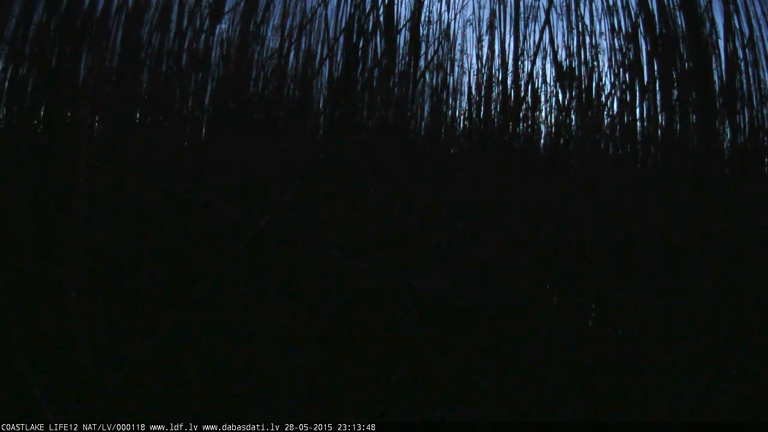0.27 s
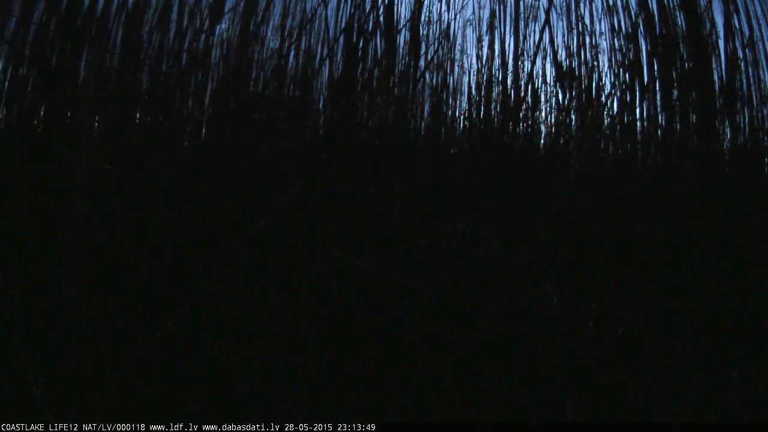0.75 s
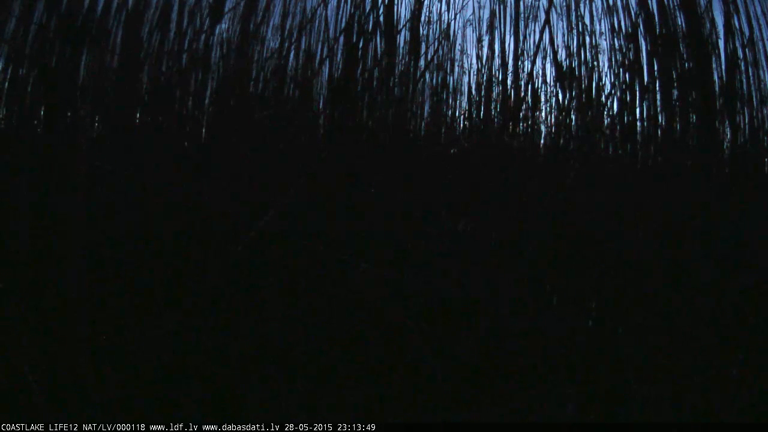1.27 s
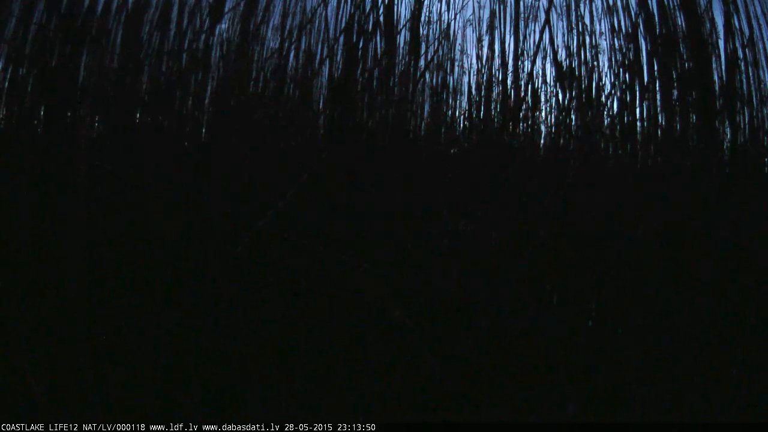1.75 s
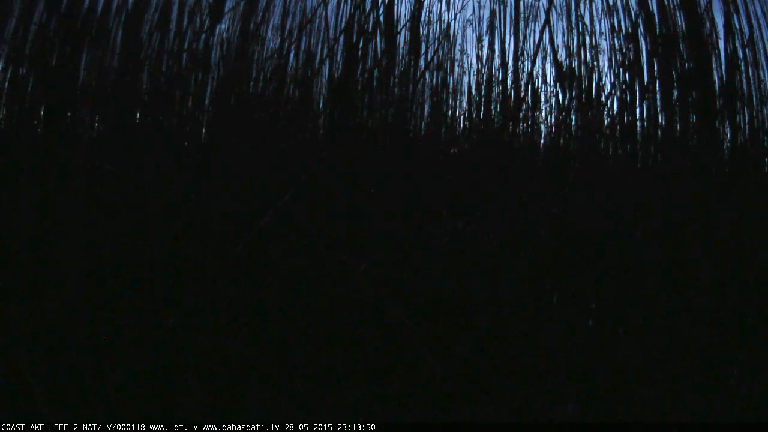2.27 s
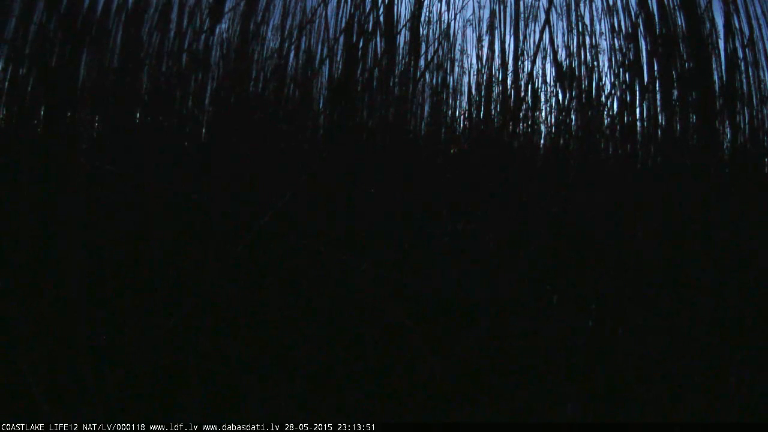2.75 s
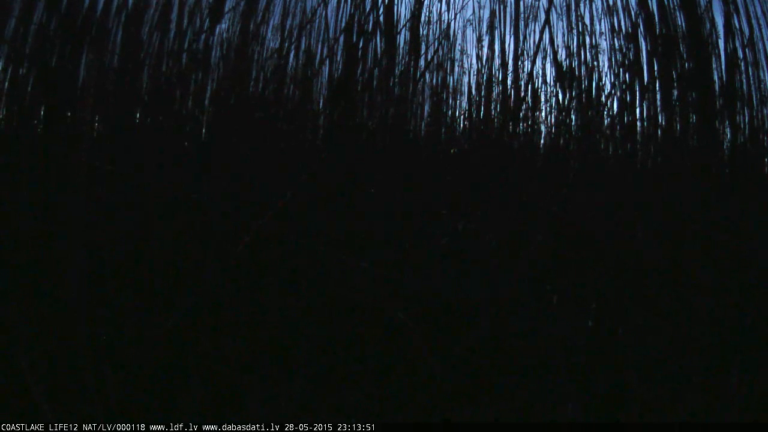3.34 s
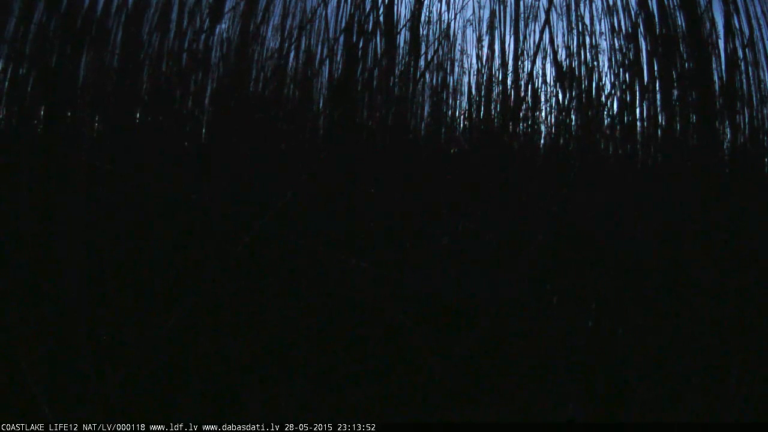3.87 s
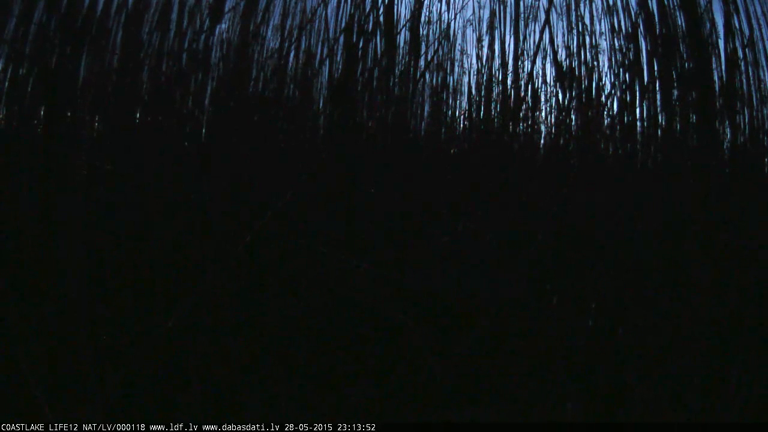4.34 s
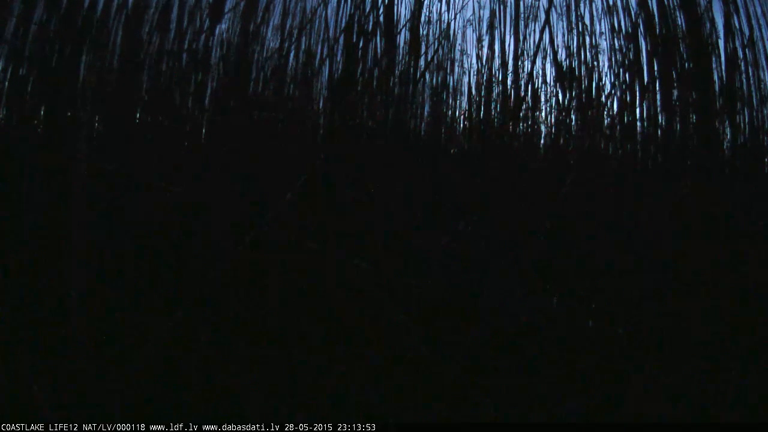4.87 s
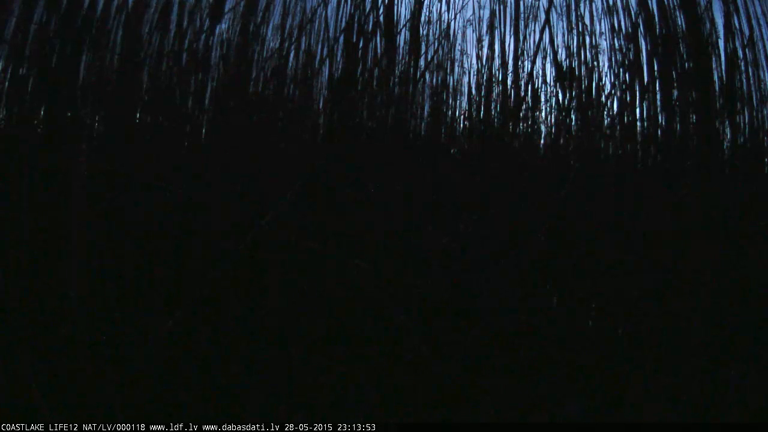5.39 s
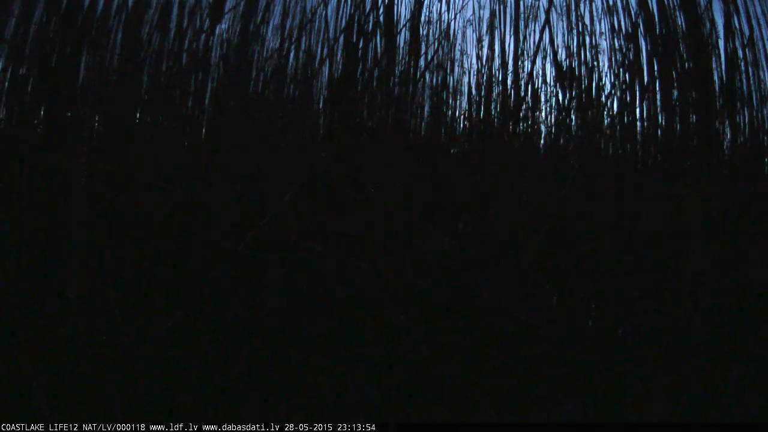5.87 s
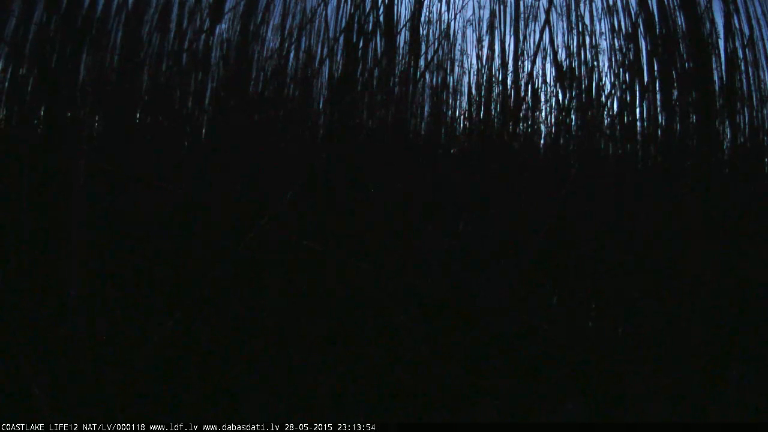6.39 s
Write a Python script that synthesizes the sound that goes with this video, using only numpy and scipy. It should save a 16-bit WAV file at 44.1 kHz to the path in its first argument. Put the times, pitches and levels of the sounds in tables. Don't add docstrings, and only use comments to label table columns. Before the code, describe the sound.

Reed bed at dusk: two low hollow booms about three seconds apart, an accelerating run of dry buzzy chirps, faint far whistles and hiss.

```python
import sys
import numpy as np
from scipy import signal
from scipy.fft import rfft, irfft, next_fast_len
from scipy.io import wavfile
from scipy.ndimage import uniform_filter1d

SR = 44100
rng = np.random.default_rng(int(sys.argv[2]) if len(sys.argv) > 2 else 0)


def gain_from_decibels(decibels):
    exponent = np.asarray(decibels, float) / 20
    return 10 ** exponent


def store_pcm(level_fs):
    pcm = np.round(np.clip(level_fs, -1, 1) * 32767).astype(np.int16)
    wavfile.write(sys.argv[1], SR, np.atleast_2d(pcm).T)


N = 291942


def evened(x):
    return x / np.sqrt(np.mean(x ** 2) + 1e-20)


def add(mix, start_s, sound):
    part = mix[round(start_s * SR):][:len(sound)]
    part += sound[:len(part)]


def drift(fastest_hz):
    t = np.arange(0, N, 64) / SR
    rates = np.geomspace(fastest_hz / 20, fastest_hz, 20)
    waves = sum(np.sin(2 * np.pi * (hz * t + rng.random())) for hz in rates)
    return np.interp(np.arange(N) / SR, t, evened(waves))


def phase(hz):
    return 2 * np.pi * np.cumsum(hz) / SR


def resonate(x, hz, width_hz):
    b, a = signal.iirpeak(hz, hz / width_hz, SR)
    return signal.lfilter(b, a, signal.lfilter(b, a, x))


# pitch_hz, level_db (per Hz)
AIR_SPECTRUM = [(12, 4.5), (25, 0), (45, -3), (70, -6.5), (110, -12), (190, -14), (350, -19.5), (800, -24),
                (2000, -25), (2700, -21), (4200, -28), (8000, -28.5), (12500, -29)]
# up_to_hz, depth_db
AIR_GUSTS = [
    (55, 0),
    (75, 4),
]
# low_hz, high_hz
RUMBLE_BAND = (75, 125)


def air():
    air_db, drone_db, drone_swell_db = -59, -73.5, 8
    drone_low_hz, drone_high_hz = RUMBLE_BAND
    size = next_fast_len(N)
    hz = np.arange(size // 2 + 1) * SR / size
    table_hz, table_db = np.transpose(AIR_SPECTRUM)
    slope_db = np.interp(np.log(hz + 1), np.log(table_hz + 1), table_db)
    spectrum = rfft(rng.standard_normal(size)) * gain_from_decibels(slope_db) * (hz > 5)

    def band(low_hz, high_hz):
        return irfft(spectrum * (hz > low_hz) * (hz <= high_hz), size)[:N]

    noise = band(drone_high_hz, SR)
    low_hz = 0
    for high_hz, depth_db in AIR_GUSTS:
        noise = noise + band(low_hz, high_hz) * gain_from_decibels(depth_db * np.tanh(drift(6.7)))
        low_hz = high_hz
    drone = evened(band(drone_low_hz, drone_high_hz))
    drone_level = gain_from_decibels(drone_db + drone_swell_db * np.tanh(drift(5)))
    return gain_from_decibels(air_db) * evened(noise) + drone * drone_level


# pitch_hz, width_hz, level_db
CHORUS_BANDS = [
    (1720, 1240, -2),
    (2550, 190, -2),
    (3050, 380, -3),
]
# time_s, level_db
CHORUS_LEVEL = [(0, -69.5), (.4, -72.5), (.7, -69), (1.2, -70.5), (1.598, -79), (2.199, -72.5), (3, -74.5),
                (4.5, -72), (6.62, -71)]


def chorus():
    bands = np.zeros(N)
    for hz, width_hz, level_db in CHORUS_BANDS:
        flicker_db = 2.5 * drift(11)
        bands += gain_from_decibels(level_db + flicker_db) * evened(resonate(rng.standard_normal(N), hz, width_hz))
    time_s, level_db = np.transpose(CHORUS_LEVEL)
    return gain_from_decibels(np.interp(np.arange(N) / SR, time_s, level_db)) * evened(bands)


# delay_s, level_db
REED_ECHOES = [
    (0.034, -8),
    (0.07, -14.5),
    (.17, -32),
    (.29, -32),
]


def reeds(x, near_db, near_t60, far_db, far_t60, echo_db, stem_hz):
    t = np.arange(SR) / SR
    shape = gain_from_decibels(near_db - 60 * t / near_t60) + gain_from_decibels(far_db - 60 * t / far_t60)
    for delay_s, level_db in REED_ECHOES:
        shape += gain_from_decibels(level_db + echo_db) * np.exp(-((t - delay_s) / 0.002) ** 2)
    taps = rng.standard_normal(SR) * shape * np.minimum(t / 0.004, 1)
    thin = signal.butter(3, stem_hz, "high", fs=SR, output="sos")
    return x + signal.oaconvolve(x, signal.sosfilt(thin, taps))[:N]


def whistle(length_s, start_hz, middle_hz, end_hz, level_db):
    u = np.linspace(-1, 1, round(length_s * SR))
    bend_hz = (start_hz + end_hz) / 2 - middle_hz
    hz = middle_hz + (end_hz - start_hz) / 2 * u + bend_hz * u ** 2
    return np.sqrt(2) * gain_from_decibels(level_db) * signal.windows.tukey(len(u), .4) * np.sin(phase(hz))


def settling_whistle(length_s, start_hz, end_hz, level_db, share):
    u = np.linspace(0, 1, round(length_s * SR))
    hz = end_hz + (start_hz - end_hz) * np.exp(-u / share)
    level = gain_from_decibels(level_db - 6 * (u - .5))
    return np.sqrt(2) * level * signal.windows.tukey(len(u), .3) * np.sin(phase(hz))


# start_s, length_s, pitch_hz, level_db
HELD_NOTES = [(.073, .017, 2790, -66), (0.062, 0.031, 3040, -70), (0.163, 0.064, 2760, -67.5),
              (0.216, .015, 3290, -66), (.035, 0.029, 1830, -65.5), (0.249, 0.038, 3060, -65),
              (0.836, 0.017, 3260, -66), (.745, .025, 1065, -74), (.775, 0.033, 2470, -60.5),
              (.815, 0.049, 2500, -59), (.874, 0.062, 2580, -62), (.935, 0.042, 2510, -86),
              (1.01, 0.019, 2440, -61.5), (1.045, 0.055, 2496, -60), (1.11, 0.17, 2470, -74),
              (1.48, .025, 2440, -65), (1.286, 0.017, 2530, -61), (1.287, 0.016, 1823, -63.5),
              (1.487, 0.013, 1770, -67), (2.974, 0.067, 2350, -66.5), (3.225, 0.086, 2290, -71),
              (3.424, 0.019, 2390, -58), (3.455, .035, 2480, -58), (3.489, .038, 2420, -56.5),
              (3.544, 0.016, 2500, -51.5), (4.118, .043, 2497, -61.5), (4.178, 0.044, 2000, -66.5),
              (4.378, 0.015, 2330, -60), (5.405, 0.032, 1850, -73)]
# start_s, length_s, middle_hz, level_db
RISING_CHIRPS = [(.008, .011, 2570, -64), (.029, 0.022, 2700, -56), (.16, 0.055, 1770, -67),
                 (1.065, 0.023, 3190, -68), (1.01, 0.016, 3120, -63), (1.048, .046, 1650, -73),
                 (2.822, .045, 1750, -72), (5.728, 0.022, 1966, -66)]
# start_s, middle_hz, first_db, second_db, third_db
CHIRP_RUNS = [
    (3.458, 1950, -67, -66, -73),
    (4.407, 1820, -75, -67, -65),
    (4.96, 1897, -67, -61.5, -61),
    (6.06, 1910, -67, -62, -66),
]
# start_s, length_s, middle_hz, level_db
FALLING_CHIRPS = [(0.05, 0.022, 2734, -59.5), (0.073, 0.037, 1680, -71), (0.758, 0.031, 2940, -65),
                  (1.312, 0.021, 2420, -56), (1.312, 0.019, 1643, -67), (5.313, .015, 1910, -66),
                  (1.514, .027, 1580, -72), (2.107, .017, 3310, -67), (2.198, 0.016, 3240, -66.5),
                  (4.113, 0.05, 2010, -64.5), (4.188, 0.03, 2320, -64), (4.36, 0.033, 1960, -68),
                  (4.543, 0.03, 1763, -69), (4.56, 0.012, 3270, -67), (5.558, 0.011, 1970, -61)]
# start_s, length_s, start_hz, end_hz, level_db
STRAIGHT_SWEEPS = [(0.459, .031, 3050, 1920, -56.5), (0.459, .03, 2000, 1107, -69),
                   (1.512, .026, 2720, 2090, -59), (1.68, 0.015, 1800, 2850, -62.5),
                   (1.693, 0.018, 3030, 1640, -58.5), (1.847, 0.026, 2280, 3270, -61),
                   (1.856, .022, 1250, 2570, -65.5), (1.908, 0.028, 2290, 2920, -57.5),
                   (1.917, 0.023, 1240, 2970, -63), (2.403, 0.02, 2000, 1300, -73),
                   (2.75, 0.0065, 1450, 2142, -62.5), (2.794, 0.01, 1480, 2170, -58.5),
                   (5.271, .045, 1616, 2120, -62.5), (5.509, .052, 1683, 2040, -62.5),
                   (2.414, 0.0212, 2400, 1740, -62), (2.501, 0.031, 2350, 1800, -62.5),
                   (6.558, 0.015, 2030, 1470, -66)]
# start_s, length_s, start_hz, end_hz, level_db
FALLING_HOOKS = [(.23, 0.032, 3110, 1510, -64), (.274, 0.027, 3050, 1545, -69),
                 (.558, .045, 3220, 1804, -62), (2.103, 0.018, 2300, 1590, -67),
                 (2.14, .03, 3530, 1605, -63), (2.189, 0.025, 3160, 1570, -65.5)]
# start_s, length_s, start_hz, end_hz, level_db
CLIMBING_ARCS = [
    (2.969, .072, 1152, 1804, -70),
    (3.196, .078, 1200, 1710, -70),
]
GLIDE_SHARES = (.27, .25)


def warbler():
    arch, rise, fall = .015, 0.067, 0.069
    run_gap_s, run_note_s = .045, 0.0216
    song = np.zeros(N)
    for s, length, hz, db in HELD_NOTES:
        add(song, s, whistle(length, hz * (1 - arch), hz, hz * (1 - arch), db))
    runs = [(s + k * run_gap_s, run_note_s, hz, db)
            for s, hz, *levels in CHIRP_RUNS for k, db in enumerate(levels)]
    for s, length, hz, db in RISING_CHIRPS + runs:
        add(song, s, whistle(length, hz * (1 - rise), hz, hz * (1 + 0.88 * rise), db))
    for s, length, hz, db in FALLING_CHIRPS:
        add(song, s, whistle(length, hz * (1 + 1.17 * fall), hz, hz * (1 - fall), db))
    for s, length, start_hz, end_hz, db in STRAIGHT_SWEEPS:
        add(song, s, whistle(length, start_hz, (start_hz + end_hz) / 2, end_hz, db))
    hook_share, arc_share = GLIDE_SHARES
    for s, *note in FALLING_HOOKS:
        add(song, s, settling_whistle(*note, hook_share))
    for s, length, start_hz, end_hz, db in CLIMBING_ARCS:
        add(song, s, settling_whistle(length, start_hz, end_hz, db, arc_share))
        add(song, s, settling_whistle(length, 2 * start_hz, 2 * end_hz, db - 3, arc_share))
    flutter_db = 3 * np.tanh(drift(60))
    return reeds(song * gain_from_decibels(flutter_db), near_db=-37, near_t60=.3, far_db=-49, far_t60=1.1,
                 echo_db=-32, stem_hz=1900)


def hoot(rows, wobble_hz, overtone_db):
    time_s, pitch_hz, level_db = np.transpose(rows)
    t = np.arange(N) / SR
    turn = phase(np.interp(t, time_s, pitch_hz) + wobble_hz * drift(12))
    level = gain_from_decibels(uniform_filter1d(np.interp(t, time_s, level_db, left=-99, right=-99), 300))
    octave = gain_from_decibels(overtone_db + 2 * drift(17)) * np.cos(2 * turn)
    return np.sqrt(2) * level * (np.cos(turn) + octave)


# time_s, pitch_hz, level_db
GULPED_AIR = [
    (2.6, 178.7, -73),
    (2.604, 183, -63.5),
    (2.802, 182, -64.5),
    (2.898, 190, -61),
    (2.978, 181.4, -59.5),
    (3.004, 171, -58),
    (3.036, 154, -91),
    (3.06, 154.5, -48),
]


def gulp():
    return hoot(GULPED_AIR, wobble_hz=1.8, overtone_db=-31)


# time_s (after start), pitch_hz, level_db (below the top)
BOOM_SHAPE = [
    (0, 131, -30),
    (.02, 135, -8),
    (.04, 150, -4),
    (.06, 148, -9.5),
    (.09, 140.8, -3.5),
    (.14, 144.6, -1.5),
    (.31, 143, -.5),
    (.44, 143.1, -16),
    (.55, 147, -29),
]
# start_s, level_db
BOOM_STARTS = [
    (-.09, -37.5),
    (3.17, -37.5),
]
# delay_s (after start), spread_s, first_boom_db, second_boom_db
BANK_RETURNS = [(.66, 0.037, -66, -56.5), (.82, 0.043, -61, -65), (.98, 0.038, -62, -73),
                (1.26, 0.092, -62.5, -66.5), (1.45, 0.19, -64, -68.5), (1.87, 0.051, -68.5, -84),
                (2.13, 0.063, -71, -74), (2.5, 0.17, -76, -71), (2.85, 0.11, -67, -82)]
# start_s, length_s, start_hz, end_hz, level_db
FAR_PUFFS = [
    (3.13, 0.041, 135, 135, -56.5),
    (5.9, 0.325, 118.8, 129.5, -72),
    (6.2, 0.26, 139.9, 136.5, -64.5),
    (6.36, .11, 137.6, 137, -61.5),
]


def booms():
    return_hz, steady_db, linger_db, linger_width_hz = 143.2, -77, -76, 9
    t = np.arange(N) / SR
    out = sum(hoot(np.add(BOOM_SHAPE, (s, 0, db)), wobble_hz=0.99, overtone_db=-37.5)
              for s, db in BOOM_STARTS)
    swells = gain_from_decibels(steady_db)
    for k, (start_s, _) in enumerate(BOOM_STARTS):
        for delay_s, spread_s, *levels_db in BANK_RETURNS:
            swells = swells + gain_from_decibels(levels_db[k]) * np.exp(-((t - start_s - delay_s) / spread_s) ** 2)
    out = out + np.sqrt(2) * swells * np.cos(phase(return_hz + 1.17 * drift(6.7)))
    for s, length, start_hz, end_hz, db in FAR_PUFFS:
        add(out, s, whistle(length, start_hz, (start_hz + end_hz) / 2, end_hz, db))
    blur = evened(resonate(rng.standard_normal(N), return_hz, linger_width_hz))
    return out + gain_from_decibels(linger_db) * blur


def crake_note(peak_db, tenth_hz, length_s, drop):
    jitter, shimmer_db, slip = .02, 3.2, .6
    u = np.arange(round(length_s * SR)) / (length_s * SR)
    closing = np.sin(np.pi / 2 * np.clip((u - .4) / 0.467, 0, 1)) ** 2
    k = np.arange(6, 14)[:, None]
    moments = rng.standard_normal((9, 9))
    wander = np.array([np.interp(u, np.linspace(0, 1, 9), row) for row in moments])
    smear = .85 * (k - 10) ** 2
    rate = tenth_hz / 10 * (1 - drop * closing - 0.033 * np.exp(-u / 0.082) + jitter * wander[8])
    lift = 1 + 0.38 * (drop - 0.04)
    throat = tenth_hz * lift * (1 + 0.019 * np.sin(np.pi * u) - 0.78 * drop * closing)
    turn = phase(rate)
    off = k * rate - throat + .01
    width_hz, steepness = np.where(off > 0, 240, 330), np.where(off > 0, 7.0, 4.0)
    passed = 1 / (1 + abs(off / width_hz) ** steepness) * np.exp(-(off / 800) ** 4)
    pulses = np.cos(k * turn + smear + slip * wander[:8][::-1])
    voice = (passed * gain_from_decibels(shimmer_db * wander[:8]) * pulses).sum(0)
    chest = gain_from_decibels(-26.5) * np.sin(turn) + gain_from_decibels(-33) * np.sin(2 * turn + 2 * wander[0])
    attack, release = np.minimum(u / 0.077, 1), np.minimum((1 - u) / 0.32, 1)
    swell = attack * (0.52 + 0.23 * np.sin(np.pi * u ** 1.7)) * release
    return gain_from_decibels(peak_db - 1.5) * swell * (evened(voice) + chest)


# start_s, peak_db, tenth_overtone_hz, length_s, closing_drop (share of pitch)
CRAKE_NOTES = [(2.3252, -35.5, 2613, 0.034, 0.047), (3.0315, -32.5, 2702, 0.033, 0.13),
               (3.6662, -34.5, 2710, 0.039, 0.13), (4.2228, -32.5, 2732, 0.032, 0.084),
               (4.7255, -33, 2756, 0.042, .13), (5.177, -32, 2750, 0.032, 0.15),
               (5.4667, -33, 2773, 0.038, 0.13), (5.744, -30.5, 2747, 0.039, 0.084),
               (5.968, -32.5, 2740, .039, 0.123), (6.1865, -33, 2750, 0.039, 0.16),
               (6.4103, -32.5, 2708, 0.047, 0.08), (6.6124, -30, 2740, 0.056, 0.098)]


def crake():
    near = np.zeros((3, N))
    for k, (s, *note) in enumerate(CRAKE_NOTES):
        add(near[k % 3], s, crake_note(*note))
    return sum(reeds(part, near_db=-42, near_t60=0.22, far_db=-43.5, far_t60=1.71,
                     echo_db=-29, stem_hz=2000) for part in near)


def scene():
    return (air() + chorus() + warbler() + gulp() + booms() + crake())[None]


def roll_off(x):
    return signal.sosfilt(signal.butter(12, 13200, fs=SR, output="sos"), x)


def record(dry):
    edge_hz, offset = 12100, .0088
    edge = signal.firwin(1023, edge_hz, window=("kaiser", 9), fs=SR)
    padded = np.pad(dry, ((0, 0), (600, 600)), "reflect")
    limited = signal.oaconvolve(padded, edge[None], "same")[:, 600:-600]
    return roll_off(limited + offset)


dry = scene()
out = record(dry)
store_pcm(out)
```